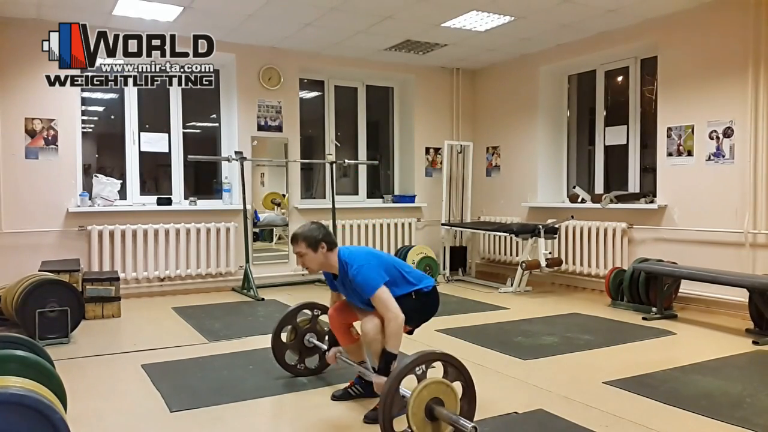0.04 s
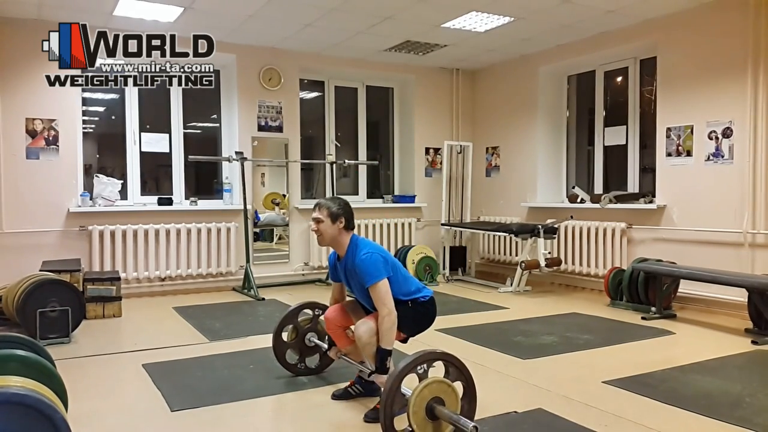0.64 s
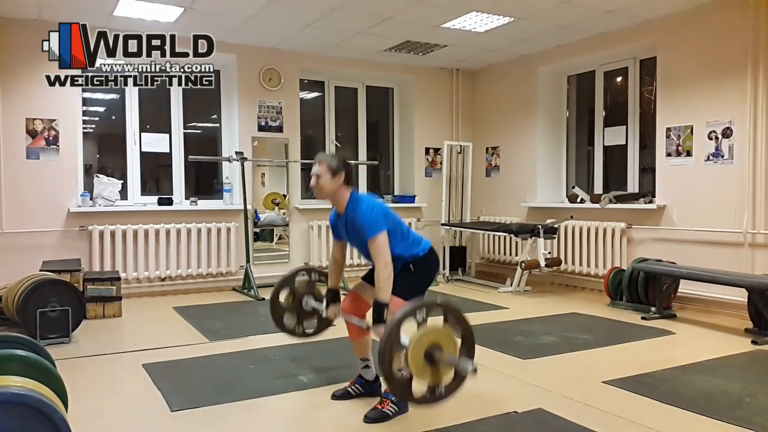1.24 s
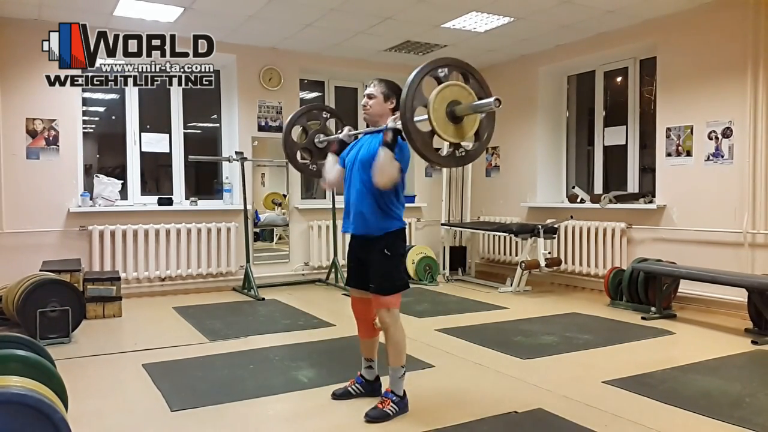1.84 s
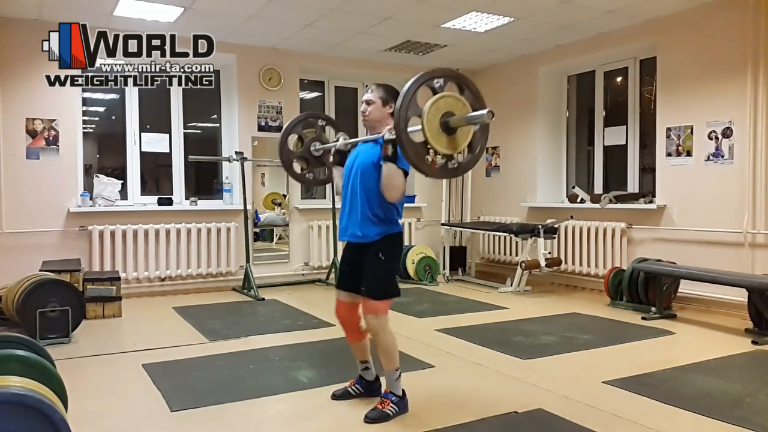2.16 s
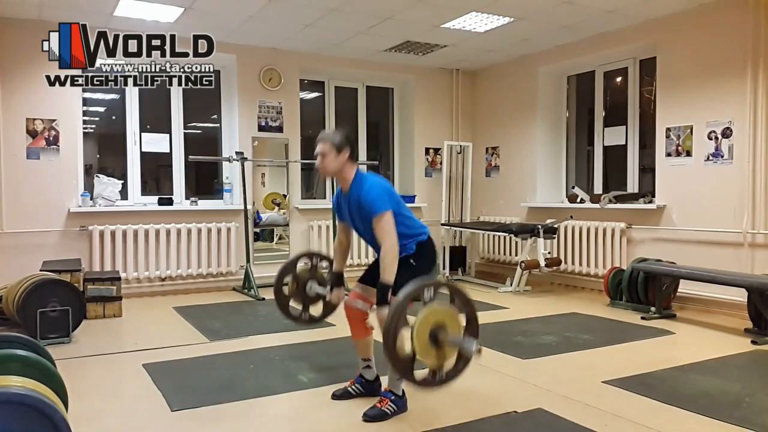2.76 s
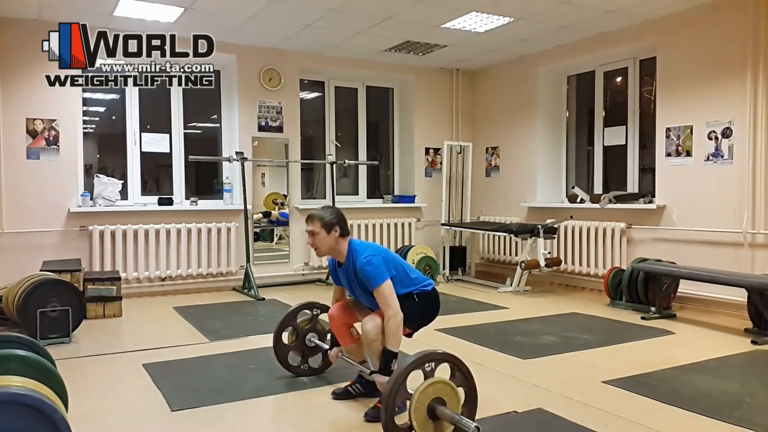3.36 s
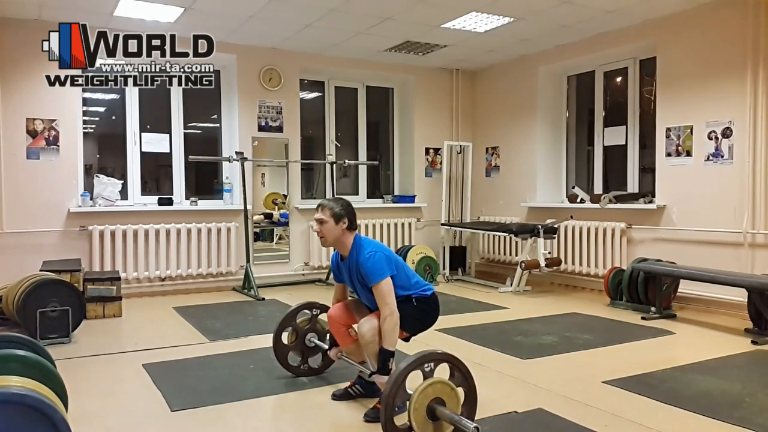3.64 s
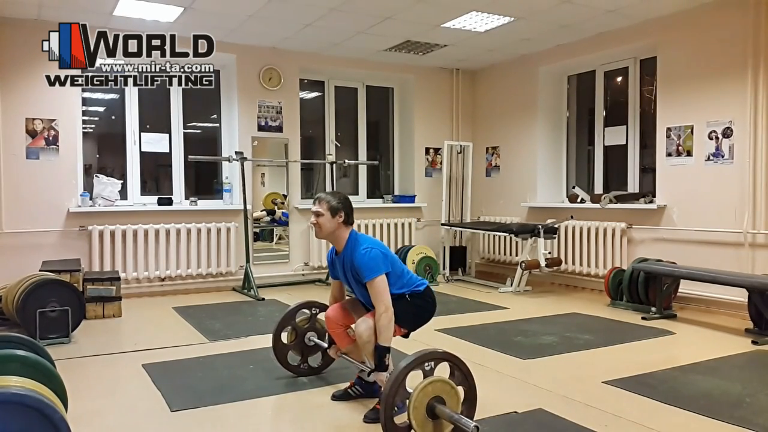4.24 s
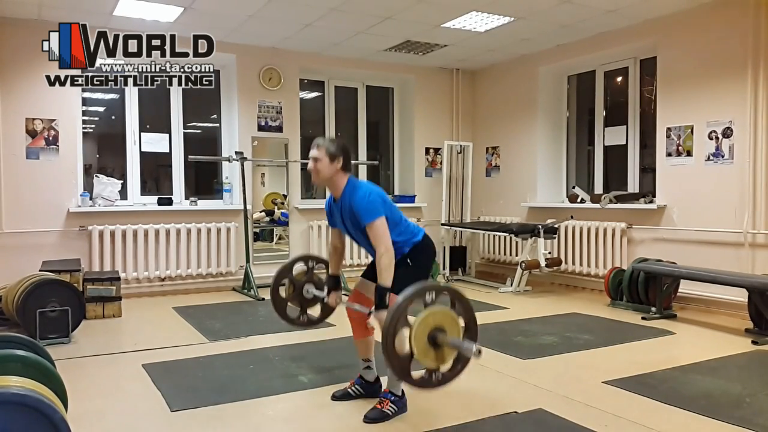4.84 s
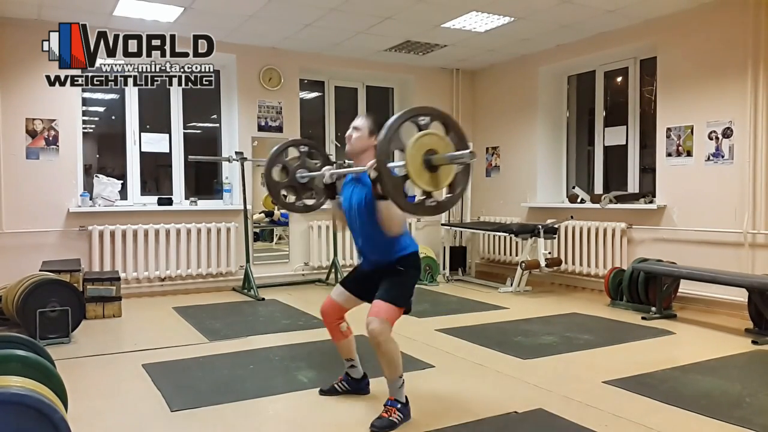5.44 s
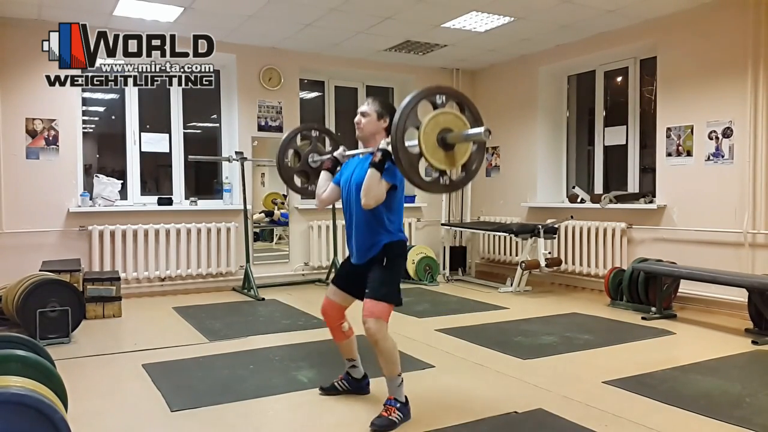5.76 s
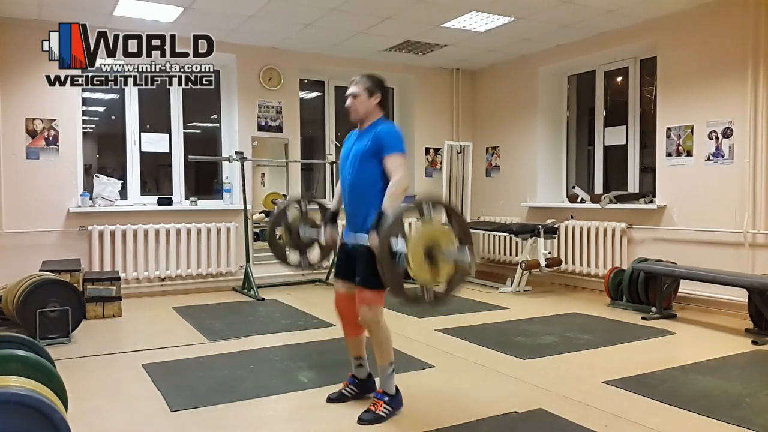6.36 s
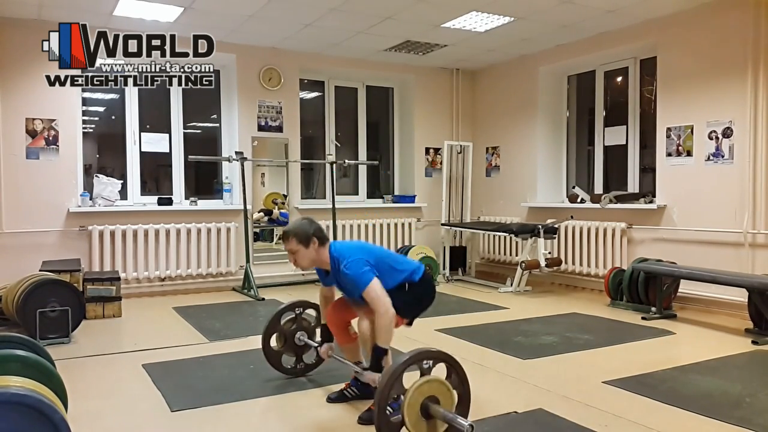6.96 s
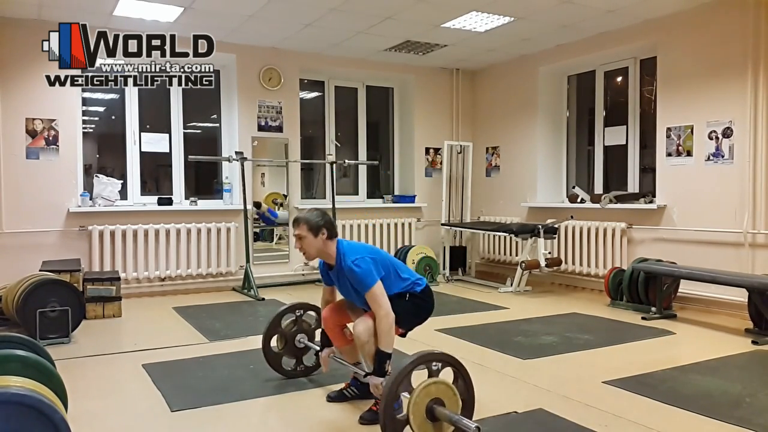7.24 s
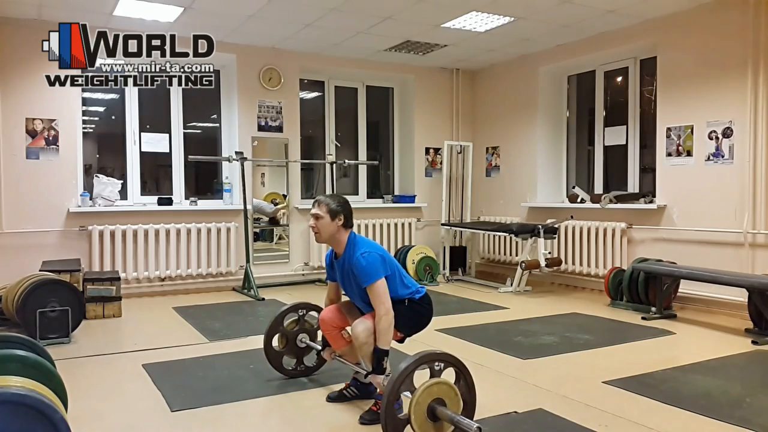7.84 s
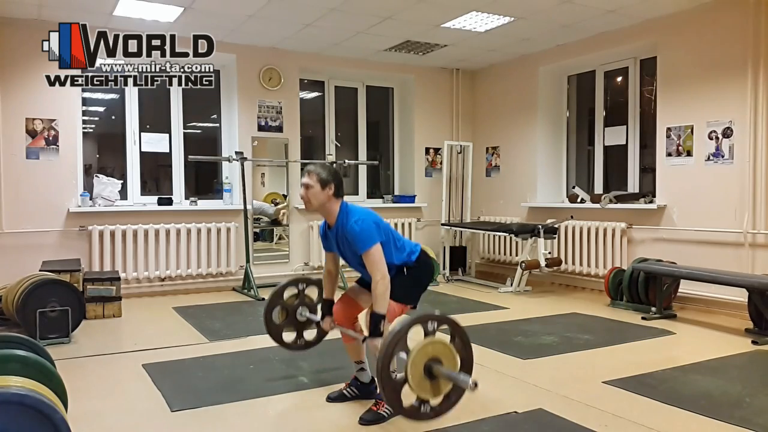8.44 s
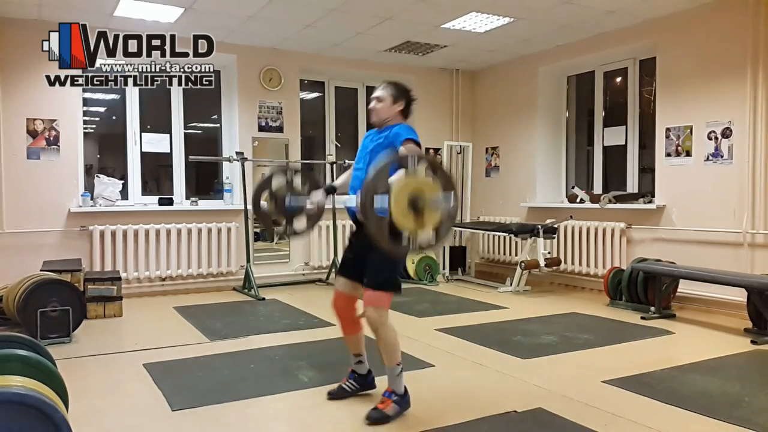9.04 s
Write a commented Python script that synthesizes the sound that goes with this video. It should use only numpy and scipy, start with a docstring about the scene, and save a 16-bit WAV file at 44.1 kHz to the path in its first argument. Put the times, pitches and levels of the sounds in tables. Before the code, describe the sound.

A loaded barbell comes down three times in an echoing gym, plates clanging and clinking over booming boards, with one hard shoe slap.

```python
"""A bare, echoing gym, heard on a stereo pair of microphones: a lifter cleans a loaded barbell.
Three times the bar comes down; its loose plates rebound on the sleeves and set the steel ringing.
In between the plates clink, a sleeve sticks and slips with a squeak, clothes rustle, the boards thud
and boom under the weight, and hard shoes slap down once under the catch.
Behind it all lie quiet room tone and a thin microphone hiss."""
import sys
import numpy as np
from scipy import signal
from scipy.fft import rfft, irfft, next_fast_len
from scipy.io import wavfile
from scipy.ndimage import map_coordinates

SR = 44100
rng = np.random.default_rng(int(sys.argv[2]) if len(sys.argv) > 2 else 0)


def generate_wav(signal):
    """Clip the signal to [-1, 1] and save it as 16-bit WAV at the path in sys.argv[1]."""
    frames = np.transpose(np.atleast_2d(signal))
    scaled = np.clip(frames, -1, 1) * 32767
    pcm = np.round(scaled).astype(np.int16)
    wavfile.write(sys.argv[1], SR, pcm)


N = 401751

# modes of the steel bar, lowest first: pitch_hz, level_db, t60_s
BAR_MODES = [(1576, -1.5, .23), (1694, 4.5, 0.11), (2004, 1.5, .1), (2566, -0.5, 0.19), (2947, -4.5, .15),
             (3333, -1.5, .18), (3386, -5, .18), (3725, 4.5, .09), (4150, -4, .12), (4525, 7.5, 0.062),
             (4620, 3.5, .07), (5000, -8.5, 0.11), (5460, -11, .14), (5943, -13, 0.16), (6438, -17, .1),
             (6930, -14.5, .08), (7510, -14, .1), (7988, -15, 0.062), (8510, -17, .12), (9080, -21, 0.15),
             (9630, -18, 0.25), (10130, -9, .15), (10850, -9.5, .08), (11340, -10.5, 0.087),
             (12360, -9, 0.086), (15000, 2, 0.13)]
# the lifter pulls, holds, lowers or rolls the bar: start_s, length_s, rumble_db, clothes_db, jiggle_db
LIFTER_MOVES = [(.9, 0.41, -57.5, -90, -49.5), (1.419, 1.2, -64, -74.5, -33.5), (2.05, 0.49, -60, -67, -41),
                (2.65, 0.59, -68, -69.5, -49), (3.2, 0.36, -46.5, -61.5, -34),
                (3.75, 0.48, -54, -72, -25.5), (4.252, .12, -70, -71.5, -23),
                (5.22, .25, -54.5, -68, -27.5), (5.6, 1.06, -58, -72, -49),
                (6.78, 0.26, -53.5, -56.5, -30.5), (7.35, 0.34, -54.5, -68.5, -45),
                (8.1, 0.19, -58, -72.5, -36.5), (8.47, 0.77, -57, -69, -32)]
MOVE_RISE_S = .051


def clangs():
    """The bar lands: each slamming plate rebounds on its sleeve and sets the steel ringing."""
    # plate slams: start_s, level_db, treble_db, plate_tone_db, lowest_bar_mode_db, per_rebound_db
    slams = [(0.0004, 1.5, -5, 10.5, -16, -2), (0.037, 3, 10, -4.5, -14, -5),
             (0.061, -1, 11, -10.5, -15, -3.5), (0.127, 0, 3.5, 5, -18, -6.5),
             (0.185, 2, 2.5, 2, -16.5, -8), (0.2, -1, 10.5, 5, -11.5, -10), (3.14, -3, 0, 4, -14.5, -9),
             (3.148, 4, -5, 4.5, -13, -5.5), (3.183, 1.5, 7, 3, -14, -5), (3.218, 0, 7, 5, -6, -2),
             (3.275, 0, 4, -4, -19, -4), (3.335, 1, 6.5, 4, -14, -3.5), (3.37, 1.5, 4, -2, -14.5, -11.5),
             (3.5002, -3, 13, 0.5, -14.5, -14), (6.977, 0, -3, -2, -9, -8.5),
             (6.985, 4.5, 0.5, -2, -7.5, -3), (7.018, 5.5, 7.5, -5, -5, -7), (7.051, 1, 9, -5.5, 8.5, -2.5),
             (7.123, 5, 10.5, -1.5, -7, -4.5), (7.184, 1.5, 13, -1.5, -9, -11.5),
             (7.203, 1, 13, 3.5, -12.5, -6)]
    crash_spectrum = [(60, -17.5), (200, -11.5), (400, -7), (1100, -8.5), (1500, -4.5), (1850, -1),
                      (2500, -5.5), (4500, -11), (5500, -21.5), (9000, -34.5), (10200, -25), (12700, -18),
                      (13800, -30.5), (15150, -15), (15900, -38)]  # plate hitting sleeve: freq_hz, level_db
    plate_modes = [(1770, -9, .06), (1862, -1.5, 0.066), (1945, -6.5, 0.038), (1987, -12, .18)]  # the plates' short clang: pitch_hz, level_db, t60_s
    out = np.zeros((2, N))
    for start, db, treble_db, plate_db, low_db, loss_db in slams:
        contacts, tones = np.zeros((2, SR // 3))
        for delay, rebound_db in rebounds(loss_db, count=3):
            steel = ring(BAR_MODES, scatter_db=2.5, attack=.0025, size=SR // 5)
            crash = burst(crash_spectrum, t60=.032, attack=.00088)
            plate = ring(plate_modes, scatter_db=3.5, attack=.0005, size=SR // 4)
            add(contacts, delay, amp(rebound_db) * (crash + amp(-4) * steel))
            add(tones, delay, amp(rebound_db + plate_db) * plate)
        add(tones, 0, amp(low_db) * ring(BAR_MODES[:1], scatter_db=5.5, attack=.0015, size=SR // 4))
        clang = gym(harden(contacts, treble_db), wet_db=2.5) + gym(tones, wet_db=-10.5)
        add(out, start, amp(db) * clang)
    return out


def rebounds(loss_db, count):
    """Delay and level of a blow and of its weaker rebounds, whose flights shorten unevenly."""
    first_flight_s, shrink, scatter = .016, .8, .2
    k = np.arange(count)
    flights = first_flight_s * shrink ** k * np.exp(scatter * rng.standard_normal(count))
    return zip(np.cumsum(flights) - flights, loss_db * k)


def harden(x, treble_db):
    """Harder metal contact puts more into the top octaves."""
    return filtered(x, lambda hz: amp(treble_db * along([(3000, 0), (9500, 1)], hz)))


def clinks():
    """Jolts of the bar seat the plates and ring the bar as well."""
    # plates shifting: start_s, level_db, treble_db, bar_ring_db, scrape_rise_s
    jolts = [(1.273, -24, -1.5, -16, 0.0034), (1.439, -28, -2, -16, 0.0046), (2.1232, -23.5, 0, -20, .003),
             (2.3932, -18.5, -4.5, -13, 0.0036), (2.405, -19, 2, -5, 0.0077),
             (2.4388, -18, 2.5, -6, 0.0018), (3.048, -28, -7.5, -13, 0.0031),
             (3.781, -22.5, 2.5, -22, 0.0023), (4.0478, -21, 0, -17.5, 0.0027),
             (4.094, -19, 1.5, -18, .003), (5.2222, -34, -9, -17, .003), (5.2791, -26.5, -16, -13.5, .004),
             (5.4414, -23, -10.5, -12, .0006), (5.56, -23.5, 10.5, -0.5, .004), (6.238, -25, 0, -5.5, .005),
             (6.2475, -16.5, 0.5, -5, .002), (6.2766, -16, 2, -6.5, 0.0037),
             (6.763, -24.5, -2.5, -7.5, 0.0027), (6.8253, -19, -6.5, -14.5, .004),
             (7.496, -15.5, 4.5, -18, 0.0025), (7.6009, -23, -3, -19, .003), (8.1158, -24.5, 3, -16, .003),
             (8.2267, -23, -7.5, -24, .002), (8.4634, -11, 5.5, -16, .001), (8.6791, -21.5, 4.5, -16, .001),
             (8.7494, -23.5, 4.5, -27, 0.0033), (8.917, -22, -5, -18, .001),
             (8.964, -18.5, 0, -16, 0.00049), (9.009, -18.5, -9.5, -21, .002)]
    out = np.zeros((2, N))
    for start, db, treble_db, ring_db, rise in jolts:
        steel = ring(BAR_MODES, scatter_db=4.5, attack=.0023, size=SR // 5)
        contact = harden(clink(rise) + amp(ring_db) * steel, treble_db)
        add(out, start, amp(db) * gym(contact, wet_db=6.5))
    return out


def clink(rise):
    """One plate scrapes a short way along its sleeve and knocks as it seats."""
    scrape_spectrum = [(60, -19), (300, -13.5), (700, 2), (1100, -7.5), (1850, 0.5), (2900, -12.5),
                       (4300, -12.5), (6000, -27), (8300, -44), (10500, -15.5), (12700, -20.5),
                       (14000, -29), (15200, -25.5), (16000, -35)]  # plate sliding on steel: freq_hz, level_db
    sleeve_modes = [(1326, 1, 0.082), (1642, -1.5, 0.14), (1828, -0.5, .12), (2270, 6, 0.04),
                    (2473, -2.5, 0.071), (3900, -4, 0.063), (4550, -13.5, 0.17), (5520, -16.5, 0.15),
                    (5943, -19.5, 0.08), (10300, -17.5, .08), (12600, -13, .08), (15200, -9.5, .1)]  # a lightly knocked sleeve: pitch_hz, level_db, t60_s
    knock = ring(sleeve_modes, scatter_db=.5, attack=.001, size=SR // 5)
    return burst(scrape_spectrum, t60=.028, attack=max(rise, .0003)) + amp(-6) * knock


def jiggle():
    """While the bar moves, its loose plates touch lightly at uneven moments."""
    touches_per_s = 12
    out = np.zeros(N)
    touches = [clink(rise=.003) for _ in range(8)]
    for start, length, _, _, db in LIFTER_MOVES:
        for k, (lag, strength) in enumerate(rng.random((32, 2))):
            age = (k + lag) / touches_per_s
            if age < length:
                add(out, start + age, amp(db + 4.2 * (strength - .5)) * touches[k % len(touches)])
    return gym(harden(out, treble_db=-7.5), wet_db=7.5)


def thuds():
    """The boards knock dully and the floor booms on under them."""
    landings = [(0.003, -3.5, -8), (0.12, -13, 0), (0.889, -24.5, -16), (0.98, -33.5, -10),
                (1.133, -28, -10.5), (1.278, -19, -21), (1.44, -27, -27.5), (2.434, -24, -12.5),
                (3.05, -12.5, -7.5), (3.141, -2, -13.5), (3.504, -1, 5.5), (3.678, -15.5, -7.5),
                (5.042, -20, -32), (5.247, -13.5, -25), (6.977, -8, -12.5), (7.551, -14.5, -27),
                (8.124, -23.5, -23), (8.47, -8.5, -28), (8.697, -14, -17), (8.788, -11.5, -30),
                (9.017, -9, -31)]  # weight meets the floor: start_s, knock_db, boom_db
    board_spectrum = [(30, -23), (60, -0.5), (110, 1), (200, -3.5), (330, -1), (600, -6.5), (1000, -20),
                      (3000, -41.5), (16000, -72)]  # the boards' knock: freq_hz, level_db
    floor_modes = [(31.2, -23.5, 1.2), (47.9, -9, 1.1), (53.13, -11.5, 0.98), (63.6, -0.5, 1.5),
                   (85.9, -8, 2.3), (123.2, -11, 0.89)]  # floor and room resonances: pitch_hz, level_db, t60_s
    out = np.zeros((2, N))
    for start, knock_db, boom_db in landings:
        add(out, start, amp(knock_db) * gym(burst(board_spectrum, t60=.12, attack=.0018), wet_db=4))
        add(out, start, amp(boom_db) * ring(floor_modes, scatter_db=4, attack=.015, size=2 * SR))
    return out


def shoes():
    """Hard soles slap the platform, a heel cracks, and the boards hum on with the loaded bar."""
    slaps = [(5.491, -1.5), (5.501, 7.5), (5.527, 1.5), (5.541, 2)]  # toe, heel and second shoe: start_s, level_db
    sole_spectrum = [(40, -4), (150, 2), (330, 5), (460, 0.5), (750, -7), (1100, -13.5), (1900, -20.5),
                     (3000, -29.5), (4500, -28), (6000, -41), (8300, -43), (10500, -26.5), (13000, -34),
                     (15200, -34.5), (16000, -60)]  # a sole's slap: freq_hz, level_db
    heel_spectrum = [(200, -24), (700, -7.5), (1500, -0.5), (2800, 10.5), (3600, -0.5), (4500, -22),
                     (8300, -56), (11000, -44), (16000, -34)]  # a hard heel's crack: freq_hz, level_db
    platform_modes = [(32.45, -12.5, 1.6), (48.44, 4, 1.5), (64.4, 4, 2.45), (95.3, 1.5, 1.3),
                      (133.7, -1, 0.42), (182, -3, 0.71), (240, -16.5, 3.4), (270, -24, 4.4),
                      (324, 2, 0.81), (485, 1.5, 0.38), (559, -4.5, 0.32), (686, -3, .4)]  # platform and loaded bar at the catch: pitch_hz, level_db, t60_s
    out = np.zeros((2, N))
    for start, db in slaps:
        add(out, start, amp(db) * gym(burst(sole_spectrum, t60=.029, attack=.00072), wet_db=5))
    heel_s = slaps[1][0]
    add(out, heel_s, amp(3) * gym(burst(heel_spectrum, t60=.016, attack=.00029), wet_db=-1.5))
    add(out, heel_s, amp(15) * ring(platform_modes, scatter_db=2, attack=.0055, size=2 * SR))
    return out


def sleeve_squeak():
    """A sleeve sticks and slips as the bar turns onto the shoulders; its pitch sinks as the turn slows."""
    overtones = [(1, 8), (2, -1), (3, -8.5), (4, -18), (5, -21), (6, -13), (7, -15), (8, -12), (10, -16)]  # stick-slip harmonics: multiple, level_db
    start_s, pitch_hz, sag_hz_per_s = 1.871, 1567, 180
    age = np.clip(np.arange(N) / SR - start_s, 0, .5)
    wavering_hz = (pitch_hz - sag_hz_per_s * age) * (1 + .007 * wobble(45))
    rough_hz = wavering_hz * (1 + .017 * wobble(500))
    phase = 2 * np.pi * np.cumsum(rough_hz) / SR
    slips = unit(sum(amp(db) * np.sin(round(k) * phase) for k, db in overtones))
    envelope = swell(start_s, hold=.1, rise=.0081, fall_db_per_s=202)
    return slips * amp(-42.5 + 3.3 * wobble(70)) * envelope


def sleeve_rub():
    """A low rub goes with the squeak, its pitch sagging as the sleeve slows."""
    start_s, start_hz, end_hz, sag_s = 1.93, 410, 273, .055
    age = np.maximum(np.arange(N) / SR - start_s, 0)
    hz = end_hz + (start_hz - end_hz) * np.exp(-age / sag_s)
    rub = np.sin(2 * np.pi * np.cumsum(hz * (1 + .11 * wobble(130))) / SR)
    envelope = swell(start_s, hold=.077, rise=.032, fall_db_per_s=74)
    return rub * amp(-42.5 + 3.7 * wobble(60)) * envelope


def creaks():
    """Brief dull creaks as the bar is gripped, each one narrow resonance."""
    grips = [(7.84, 570, -26.5), (8.408, 555, -20.5)]  # creaking grips: start_s, pitch_hz, level_db
    out = np.zeros(N)
    for start, hz, db in grips:
        add(out, start, amp(db) * ring([(hz, 0, .16)], scatter_db=0, attack=.0058, size=SR // 2))
    return gym(out, wet_db=1.5)


def floor_rumble():
    """The floor rumbles under the shifting weight."""
    spectrum = [(25, -14), (60, 0), (120, -5), (300, -7.5), (700, -27), (2000, -57.5), (8000, -76.5)]  # the loaded floor: freq_hz, level_db
    load = sum(amp(db) * swell(start, length, MOVE_RISE_S, fall_db_per_s=58)
               for start, length, db, _, _ in LIFTER_MOVES)
    return load * amp(2.93 * wobble(14)) * noise(spectrum, N)


def clothes():
    """Clothes rustle with every move."""
    spectrum = [(200, -11.5), (500, 8), (2200, -2), (3500, -2.5), (5800, -8.5), (8300, -48), (10500, -8),
                (12500, -11.5), (15500, -3), (16200, -30.5)]  # rubbing fabric: freq_hz, level_db
    stir = sum(amp(db) * swell(start, length, MOVE_RISE_S, fall_db_per_s=71)
               for start, length, _, db, _ in LIFTER_MOVES)
    return stir * amp(1.5 * wobble(35)) * noise(spectrum, N)


def shirt_swish():
    """One bright swish as the bar slides off the shirt."""
    spectrum = [(3000, -18.5), (8300, -19), (10500, 6.5), (12500, -4), (15500, -1.5), (16200, -23)]  # steel over cloth: freq_hz, level_db
    return amp(-63) * swell(start=2.112, hold=.2, rise=.0103, fall_db_per_s=84) * noise(spectrum, N)


def gym(x, wet_db):
    """Direct sound, dense early answers of floor and walls, and a fresh tail whose treble dies first."""
    decay_times = [(60, 1.1), (250, 0.47), (600, 0.73), (2000, 0.74), (4500, 0.68), (8000, 0.61),
                   (15000, 0.31)]  # the room's reverberation: freq_hz, t60_s
    hz, t, spectra = signal.stft(rng.standard_normal((2, SR)), SR, nperseg=512)
    spectra = spread(spectra, hz[:, None]) * amp(-60 * t / along(decay_times, hz)[:, None])
    tail = signal.istft(spectra, SR, nperseg=512)[1]
    age = np.arange(tail.shape[1]) / SR
    build_up = 1 - np.exp(-age / .003)
    early = 1 + .66 * np.exp(-age / .026)
    response = amp(wet_db) * unit_energy(tail * build_up * early)
    response[0, 8] += np.sqrt(.5)  # direct sound reaches the left microphone 8 samples late
    response[1, 0] += np.sqrt(.5)
    return signal.fftconvolve(x[None], response, axes=1)[:, :N]


def spread(pair, hz):
    """Two unrelated spectra become left and right, alike in the bass."""
    likeness = [(60, 1), (250, 0.71), (500, 0.26), (1200, .15), (15000, 0.14)]  # room sound at the two microphones: freq_hz, correlation
    turn = np.arccos(np.clip(along(likeness, hz), -1, 1)) / 2
    mid, side = pair[0] * np.cos(turn), pair[1] * np.sin(turn)
    return np.array([mid + side, mid - side])


def microphone_colour(hz):
    """Gains of two unlike microphones: the right favours bass and mids, the left the top octave."""
    balance = [(60, -3), (210, -5), (700, -9), (1800, -10.5), (4300, -12.5), (6400, -11), (8300, 1),
               (10000, 13), (12500, 10), (15000, 4)]  # colour of the pair: freq_hz, left_minus_right_db
    tilt = amp(np.outer([.5, -.5], along(balance, hz)))
    return tilt / np.sqrt(np.mean(tilt ** 2, axis=0))


def room_tone():
    """The quiet room, and a narrow hiss mostly in the right microphone."""
    hush = [(15, -35), (25, -2.5), (64, -5), (110, -5), (210, -8), (400, -13), (700, -20), (1300, -32),
            (3000, -37.5), (6000, -56), (9000, -49.5), (13000, -40.5), (16000, -37.5)]  # the still gym: freq_hz, level_db
    air = unit(filtered(rng.standard_normal((2, N)), lambda hz: amp(along(hush, hz))))
    air = irfft(spread(rfft(air), np.fft.rfftfreq(N, 1 / SR)), N)
    hiss = noise([(2500, -52.5), (3700, -13.5), (4250, 1.5), (4700, -9.5), (5500, -19.5),
                  (7000, -45.5)], N)
    return amp(-63) * air + amp([[-86], [-65.5]]) * hiss


def ring(modes, scatter_db, attack, size):
    """Struck modes of energy 1; the loose plates load them a little differently at every blow."""
    t = np.arange(size, dtype=np.float32) / SR
    hz, db, t60 = np.array(modes, np.float32).T[..., None]
    phase, strength, detune = rng.standard_normal((3, len(modes), 1)).astype(np.float32)
    hz = hz * (1 + .002 * detune)
    partials = np.exp(-t / t60 * np.float32(np.log(1000))) * np.sin(2 * np.pi * hz * t + phase)
    gains = amp(db + scatter_db * strength)[:, 0]
    return unit_energy(gains @ partials * (1 - np.exp(-t / attack)))


def burst(spectrum, t60, attack):
    """One contact: coloured noise that dies quickly, energy 1."""
    t = np.arange(SR // 5) / SR
    envelope = amp(-60 * t / max(t60, .002)) * (1 - np.exp(-t / attack))
    return unit_energy(noise(spectrum, len(t)) * envelope)


def swell(start, hold, rise, fall_db_per_s):
    """An envelope that rises, holds until hold seconds after its start, and dies away."""
    age = np.arange(N) / SR - start
    return np.clip(age / rise, 0, 1) * amp(-fall_db_per_s * np.clip(age - hold, 0, 2))


def noise(spectrum, size):
    """Coloured noise of rms 1."""
    return unit(filtered(rng.standard_normal(size), lambda hz: amp(along(spectrum, hz))))


def wobble(rate):
    """A smooth random curve, rate knots a second."""
    return map_coordinates(rng.standard_normal(int(N * rate / SR) + 4), [np.arange(N) * rate / SR])


def filtered(x, response):
    """x through a gain that depends on frequency."""
    size = x.shape[-1]
    padded = next_fast_len(size + 4096, True)
    return irfft(rfft(x, padded) * response(np.fft.rfftfreq(padded, 1 / SR)), padded)[..., :size]


def along(points, hz):
    """Interpolate (freq_hz, value) points on a log axis."""
    freqs, values = np.transpose(points)
    return np.interp(np.log(hz + 1), np.log(freqs + 1), values)


def add(track, start_s, x):
    """Mix x into the track at start_s."""
    start = max(round(start_s * SR), 0)
    track[..., start:start + x.shape[-1]] += x[..., :max(track.shape[-1] - start, 0)]


def amp(db):
    """Decibels to gain."""
    return 10 ** (np.asarray(db) / 20)


def unit(x):
    """x at rms 1."""
    return x / np.sqrt(np.mean(x ** 2) + 1e-20)


def unit_energy(x):
    """x at energy 1."""
    return x / np.sqrt(np.sum(x ** 2) + 1e-20)


def scene():
    """The lift as the two microphones hear it, over the room tone."""
    lift = clangs() + clinks() + jiggle() + thuds() + shoes()
    lift += gym(sleeve_squeak() + sleeve_rub(), wet_db=-4) + creaks()
    lift += gym(floor_rumble() + clothes() + shirt_swish(), wet_db=5)
    return amp(4.5) * filtered(lift, microphone_colour) + room_tone()


def record(dry):
    """The recorder keeps nothing above its band limit."""
    return filtered(dry, lambda hz: hz < 16100)


dry = scene()
out = record(dry)
generate_wav(out)
```